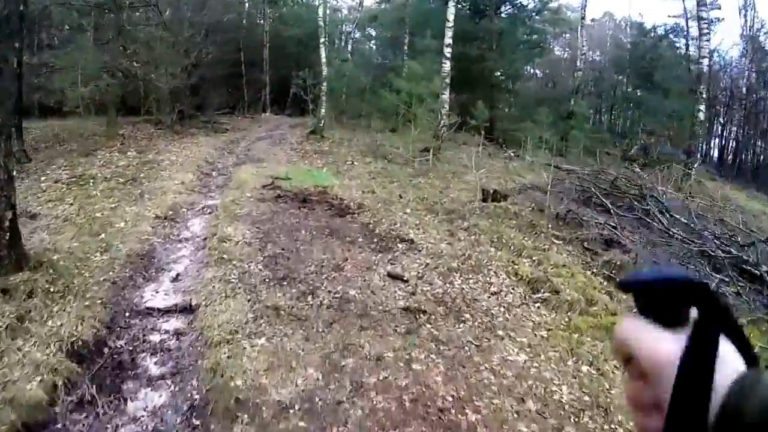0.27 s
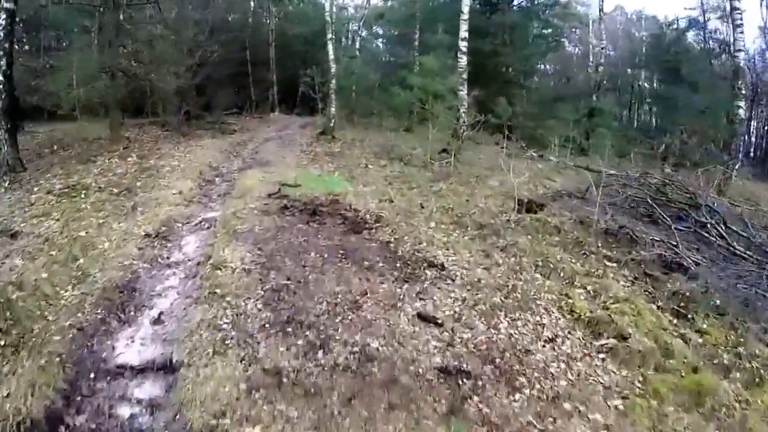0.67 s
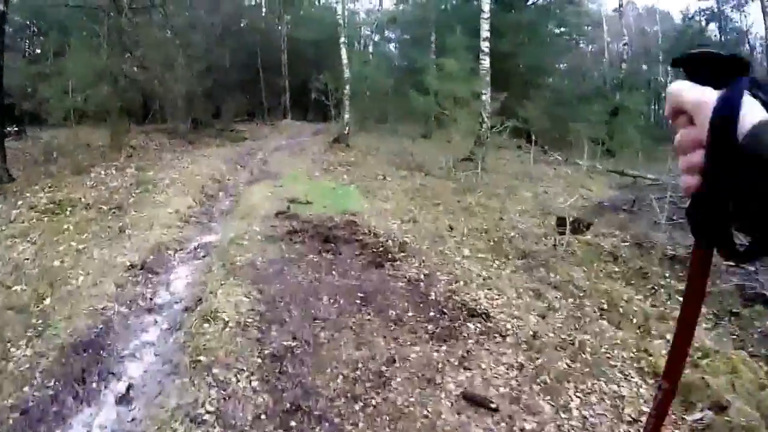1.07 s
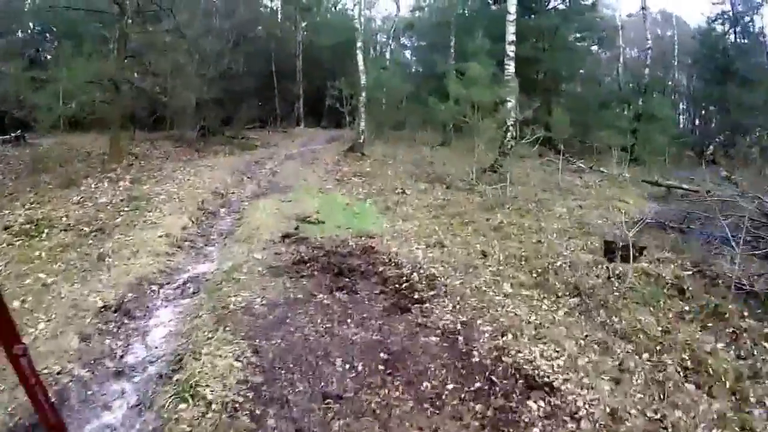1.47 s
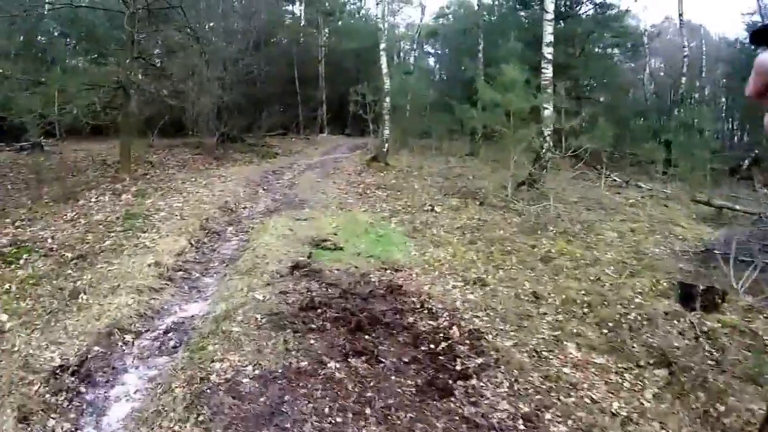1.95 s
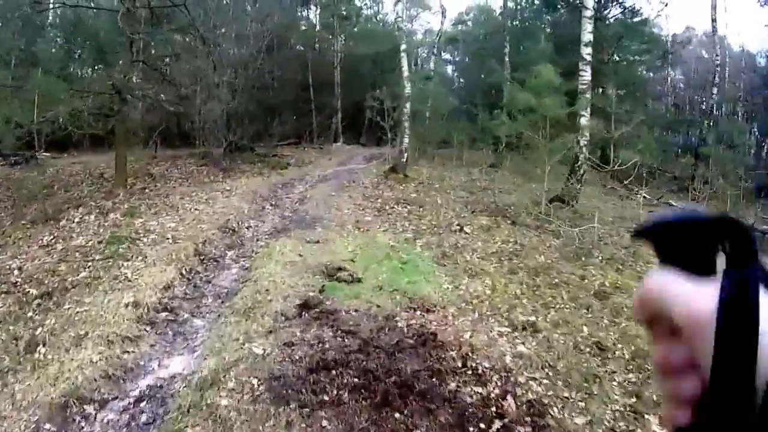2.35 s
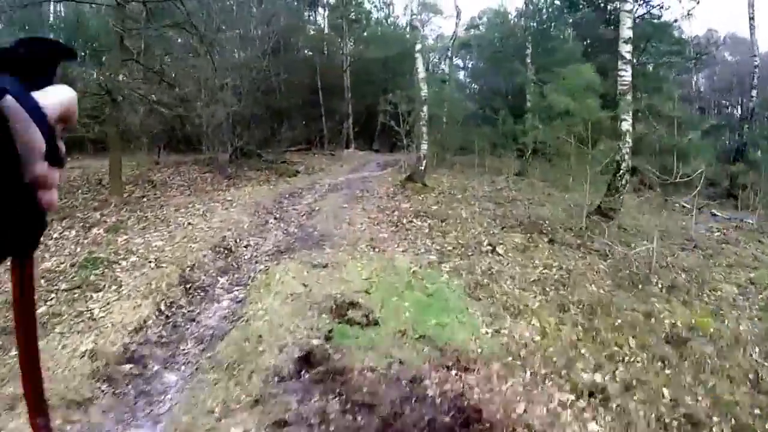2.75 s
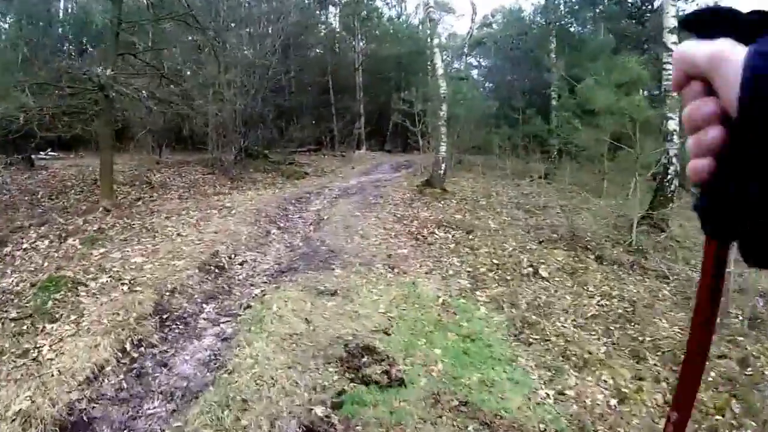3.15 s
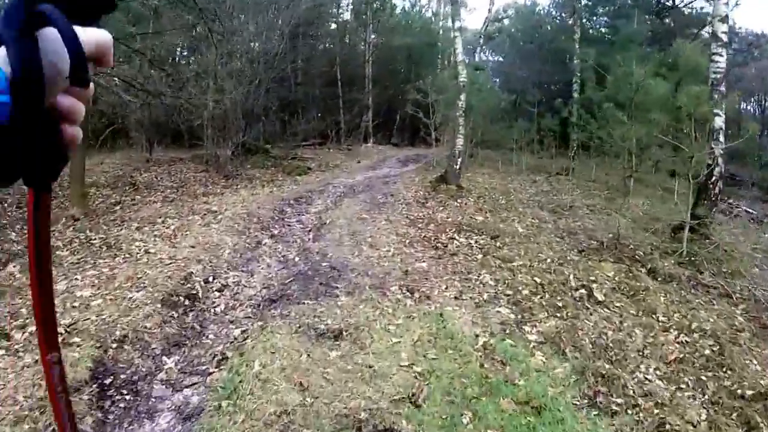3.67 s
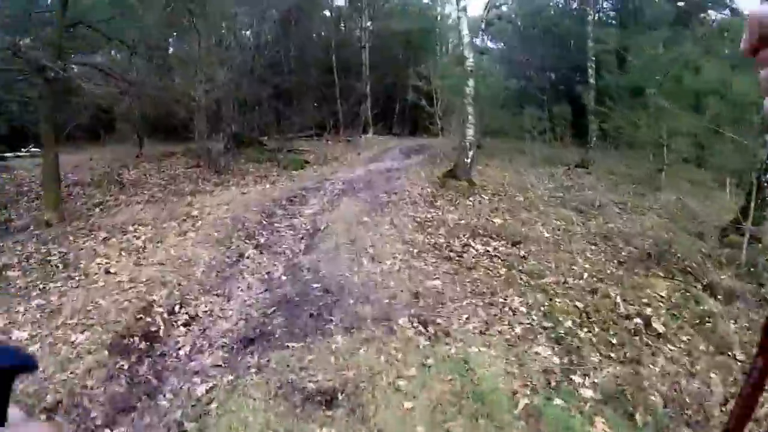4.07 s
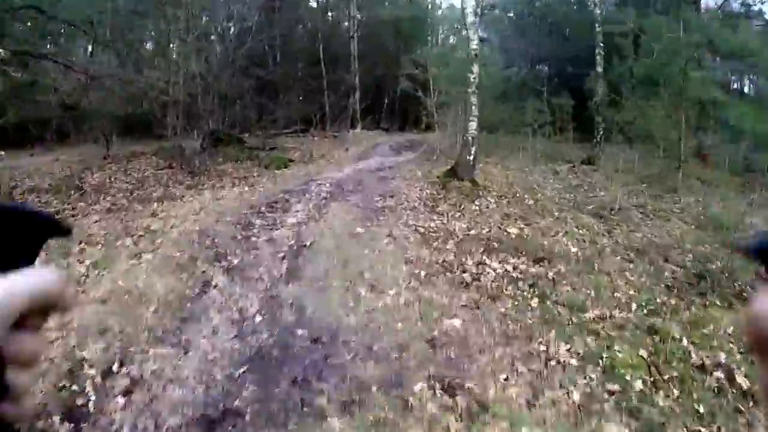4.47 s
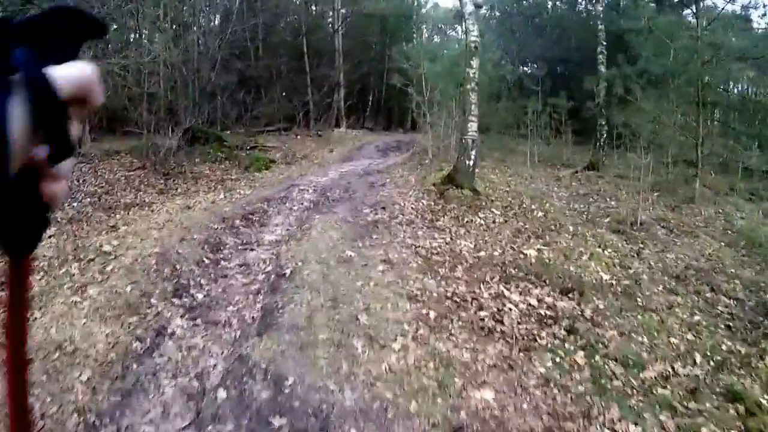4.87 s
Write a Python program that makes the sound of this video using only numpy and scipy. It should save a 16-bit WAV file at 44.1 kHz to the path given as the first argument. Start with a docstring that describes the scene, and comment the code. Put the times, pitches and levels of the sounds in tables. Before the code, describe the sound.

A hiker with poles walks steadily through woodland for about five seconds, heard by a body-worn microphone sealed in a plastic case. Ten steps fall roughly every half second, near 0.3, 0.9, 1.4, 1.9, 2.4, 3.0, 3.5, 4.0, 4.6 and 5.1. Each is a deep sway and shudder with soft, cushioned thumps that briefly ring the mount, and a short dull pat of damp soil. Leaves rustle and crunch in granular clumps, quieter in the first step, fuller from 1.3 onward. Twigs crack in dry, boxy little snaps at 0.8 and 1.3, in a dense cluster from 1.8 to 2.1, then at 2.3, 2.8 to 3.0, 3.5, 4.0, 4.5 to 4.7 and 4.9. One pole tip clicks sharply on stone at 3.15. The case colours the crackle with narrow mid-high resonances and dulls the treble. Constant soft hiss and faint air lie underneath.

```python
"""Forest walk with trekking poles

A hiker walks on soft, leafy ground, heard by a body-worn camera in a closed plastic case.
Each step is swaying and shuddering noise with shaped jolts; landings are soft pushes that ring the mount.
Leaves crunch as clumps of tiny snaps, twigs crack as pitched noise bursts, and a pole tip clicks on stone.
The case muffles leaves, twigs and tip and rings at a few resonances, over a steady hiss and faint air."""
import sys
import numpy as np
from scipy import signal
from scipy.fft import rfft, irfft
from scipy.io import wavfile
from scipy.ndimage import uniform_filter1d, map_coordinates

SR = 44100
rng = np.random.default_rng(int(sys.argv[2]) if len(sys.argv) > 2 else 0)


def wav_out(sig):
    """Save sig, one row per channel (or a flat mono array), as 16-bit PCM at SR to the path in sys.argv[1]."""
    wavfile.write(sys.argv[1], SR, np.round(np.clip(np.atleast_2d(sig).T, -1, 1) * 32767).astype(np.int16))


N = 225615
HZ = np.fft.rfftfreq(2 ** 18, 1 / SR)  # frequency grid of every filter


def amp(db):
    """Decibels to gain."""
    return 10 ** (np.asarray(db) / 20)


def unit(x):
    """Scale x to rms 1."""
    return x / np.sqrt(np.mean(x ** 2) + 1e-20)


def colour(points):
    """Gain of a (frequency [Hz], level [dB]) spectrum, read on a log frequency axis."""
    hz, db = np.transpose(points)
    return amp(np.interp(np.log(HZ + 1), np.log(hz + 1), db))


def resonances(modes):
    """Causal response of damped modes side by side, each (frequency [Hz], width [Hz], gain [dB])."""
    return sum(amp(db) * 1j * HZ * width / (hz * hz - HZ ** 2 + 1j * HZ * width)
               for hz, width, db in modes)


def filtered(x, response):
    """Pass x through a frequency response."""
    padded_size = 2 * (len(HZ) - 1)
    return irfft(rfft(x, padded_size) * response)[:N]


def noise(response):
    """Coloured noise at rms 1."""
    return unit(filtered(rng.standard_normal(N), response))


def even(x, size=3000):
    """Noise held near rms 1, so that it neither fades out nor surges."""
    smoothed = uniform_filter1d(uniform_filter1d(x ** 2, size), size)
    power = np.abs(smoothed)
    return unit(x / np.sqrt(power + power.mean() / 10))


def wobble(rate):
    """A smooth random curve with rate knots a second."""
    knots = rng.standard_normal(int(N * rate / SR) + 4)
    return map_coordinates(knots, [np.arange(N) * rate / SR])


def causal(gain, size=4096):
    """The most prompt (minimum-phase) impulse response with this gain, found by folding its cepstrum."""
    coarse = gain[::2 * (len(HZ) - 1) // size]
    cepstrum = irfft(np.log(np.maximum(coarse, 1e-6)))
    cepstrum[1:size // 2] *= 2
    cepstrum[size // 2 + 1:] = 0
    return irfft(np.exp(rfft(cepstrum)))


def add(track, s, sound):
    """Mix a sound into the track at time s."""
    part = track[max(0, round(s * SR)):][:len(sound)]
    part += sound[:len(part)]


def swell(s, hold_s, rise_db_per_s, fall_db_per_s):
    """A gain that rises, holds around time s and falls, straight in decibels."""
    t = np.arange(N) / SR
    start, end = s - hold_s / 2, s + hold_s / 2
    below_db = np.maximum(rise_db_per_s * (start - t), fall_db_per_s * (t - end))
    return amp(-np.clip(below_db, 0, 120))


def stride(times, levels_db, shape, rest_db):
    """Every step swells in the same shape, at its own level, over a resting level; powers add."""
    delay, *form = shape
    power = amp(rest_db) ** 2
    for s, db in zip(times, levels_db):
        power = power + (amp(db) * swell(s + delay, *form)) ** 2
    return np.sqrt(power)


# footsteps: (time of mid-stance [s], sway level [dB], shudder level [dB], rustle level [dB])
FOOTSTEPS = [(0.282, -42.5, -58.5, -64.5), (0.861, -42.5, -58.5, -64.5), (1.403, -39.5, -55, -62.5),
             (1.946, -38.5, -56.5, -61), (2.427, -39.5, -53.5, -62), (3.02, -41.5, -54.5, -62),
             (3.484, -37.5, -54.5, -61), (4.036, -39.5, -53, -64.5), (4.556, -39, -56, -61),
             (5.061, -40.5, -51.5, -62)]
# body jolts as a foot takes the weight and pushes off: (time [s], peak level [dB], half length [s])
BODY_JOLTS = [(0.268, -32, .012), (0.42, -39, .016), (0.847, -25.5, .013), (0.945, -36, .022),
              (1.37, -30, .018), (1.488, -31, .018), (1.929, -29.5, .017), (2.003, -28, .015),
              (2.36, -39, .012), (2.419, -28.5, .013), (2.505, -38, .014), (3.002, -28.5, .015),
              (3.072, -36, .014), (3.418, -37.5, .016), (3.551, -27.5, .014), (4.012, -26.5, .016),
              (4.1, -36, .02), (4.39, -41, .012), (4.54, -28.5, .014), (4.65, -35, .018),
              (5.015, -32, .014)]
# relative noise spectra of the rocking camera and its shaking mount: (frequency [Hz], level [dB])
SWAY_SPECTRUM = [(2, -31), (6, 0.5), (10, 2), (16, -4), (24, -22), (33, -16), (48, -24), (70, -27.5),
                 (130, -42), (400, -120)]
SHUDDER_SPECTRUM = [(30, -3), (55, 3.5), (85, 1), (110, 4), (145, -6), (220, -10.5), (350, -9.5),
                    (600, -24), (1500, -22), (4000, -100)]
# swell within a step: (middle after mid-stance [s], hold [s], rise [dB/s], fall [dB/s])
SWAY_SWELL = (0.0094, 0.16, 217, 130)
SHUDDER_SWELL = (0.056, 0.013, 33, 97)


def body(shudder_db=-3, rest_sway_db=-57.5, rest_shudder_db=-67.5):
    """The stride rocks the camera, jolts it on landing and push-off and makes the mount shudder."""
    times, sways, shudders, _ = np.transpose(FOOTSTEPS)
    out = stride(times, sways, SWAY_SWELL, rest_sway_db) * even(noise(colour(SWAY_SPECTRUM)))
    shudder = stride(times, shudders, SHUDDER_SWELL, rest_shudder_db) * even(noise(colour(SHUDDER_SPECTRUM)))
    out += amp(shudder_db) * shudder
    for s, db, half in BODY_JOLTS:
        u = (np.arange(N) / SR - s) / half
        push = (1 - u ** 2) / (1 + u ** 2 / 3) ** 3  # one push between two rebounds
        out += amp(db) * push
    return out


# heels and soles knocking on the ground, with a higher cut-off on firm ground:
# (time [s], relative push level [dB], push cut-off [Hz], soil pat level [dB])
GROUND_THUDS = [(0.152, -47, 397, -55), (0.211, -48, 496, -55), (0.452, -43.5, 240, -63),
                (0.764, -50, 150, -58), (0.799, -57, 600, -48.5), (0.819, -47, 400, -51.5),
                (0.831, -39.5, 450, -54), (0.882, -43, 250, -67), (0.967, -44.5, 303, -60),
                (1.323, -38, 250, -53.5), (1.413, -40, 200, -69), (1.4238, -48, 350, -70),
                (1.475, -45.5, 300, -55), (1.839, -45, 400, -54), (1.916, -43, 500, -50),
                (1.934, -37.5, 400, -49.5), (1.993, -43.5, 300, -70), (2.08, -48.5, 400, -55),
                (2.362, -47, 121, -58), (2.453, -51, 240, -66), (2.947, -49, 300, -52),
                (2.996, -44, 300, -53), (3.168, -40.5, 300, -51), (3.477, -39, 151, -64),
                (3.535, -41, 500, -49.5), (3.543, -34, 180, -60), (3.963, -61, 354, -45),
                (3.995, -43, 500, -68), (4.48, -57, 300, -48), (4.652, -43, 201, -64),
                (4.955, -42, 403, -54), (5.037, -52, 400, -46)]
# resonances of the camera mount: (frequency [Hz], width [Hz], gain [dB])
MOUNT_MODES = [(50, 13, 0.5), (104.6, 22, 5), (182, 91, -37.5)]


def thuds(level_db=-2, pat_hz=175, pat_width_hz=160, pat_t60_s=0.069, pat_attack_s=0.0021):
    """The ground cushions each landing into a push that rings the mount; the damp soil gives a short pat."""
    out, t = np.zeros(N), np.arange(SR // 4) / SR
    mount = resonances(MOUNT_MODES)
    soil = noise(resonances([(pat_hz, pat_width_hz, 0)]) ** 2)
    fade = amp(-60 * t / pat_t60_s) * (1 - np.exp(-t / pat_attack_s))
    fade_rms = np.sqrt(np.mean(fade ** 2))
    for s, db, soft_hz, pat_db in GROUND_THUDS:
        cushion = (1 + 1j * HZ[::8] / soft_hz) ** 2  # two gentle low-passes
        push = irfft(mount[::8] / cushion)[:len(t)]
        push = push / np.abs(push).max()
        soil_here = np.roll(soil, -round(s * SR))[:len(t)]
        pat = unit(soil_here * fade) * fade_rms
        add(out, s, amp(pat_db) * pat - amp(db + level_db) * push)
    return out


# boots and pole tips pressing into leaves; brightness is positive on dry leaves, negative on damp soil:
# (time of the middle [s], relative level [dB], hold [s], brightness [dB])
LEAF_CRUNCHES = [(0.217, -60, 0.017, -8), (0.278, -60.5, 0.027, 2.5), (0.412, -66.5, .006, -4.5),
                 (0.452, -67, 0.019, 9), (0.765, -60, 0.021, -7), (0.8, -60.5, 0.033, 1),
                 (0.982, -68, .006, 3), (1.342, -56, 0.038, 1), (1.43, -55, 0.013, -2),
                 (1.478, -55, 0.016, -3), (1.745, -63.5, 0.06, 0), (1.923, -51, 0.014, -4),
                 (1.958, -54, 0.03, -4), (2.078, -59, 0.021, -5), (2.28, -61, 0.087, -7),
                 (2.775, -65, 0.048, 7.5), (2.94, -53, 0.0063, -8), (3.023, -54.5, 0.054, 2.5),
                 (3.09, -57, 0.011, -11.5), (3.441, -56.5, 0.01, 1), (3.501, -60.5, 0.018, 5),
                 (3.541, -61.5, 0.0083, -5), (3.81, -58, 0.023, -7), (4.003, -57, 0.053, 0.5),
                 (4.455, -54, 0.023, -5), (4.493, -58.5, 0.026, -7), (4.647, -68, 0.0055, -4),
                 (4.669, -61.5, 0.0099, 2.5), (4.934, -60.5, .006, 2), (4.971, -55, 0.011, -2.5),
                 (5.046, -52, 0.017, -4.5)]
# edges of a crunch: (rise [dB/s], fall [dB/s])
CRUNCH_EDGES = (500, 630)
# rustle swell within a step: (middle after mid-stance [s], hold [s], rise [dB/s], fall [dB/s])
RUSTLE_SWELL = (.01, .18, 40, 45)


def tread(rest_rustle_db=-75.5):
    """Dull and bright leaf levels: a long rustle as each foot rolls, crunches where a sole or tip sinks in."""
    times, _, _, rustles = np.transpose(FOOTSTEPS)
    dull = bright = stride(times, rustles, RUSTLE_SWELL, rest_rustle_db) ** 2
    for s, db, hold, bright_db in LEAF_CRUNCHES:
        power = (amp(db) * swell(s, hold, *CRUNCH_EDGES)) ** 2
        dull = dull + power
        bright = bright + power * amp(bright_db) ** 2
    return np.sqrt(dull), np.sqrt(bright)


def litter(level_db=-1, snaps_per_s=1100, snap_spread_db=2.8, clump_db=2.3, split_hz=1900, order=12):
    """Leaves break in tiny snaps, in clumps, denser as the weight comes on them."""
    dull, bright = tread()
    density = snaps_per_s * np.sqrt(dull / dull.max())  # full rate at the heaviest moment
    snaps = rng.random(N) < density / SR
    sizes = amp(snap_spread_db * np.minimum(rng.exponential(size=N), 3))
    signs = rng.choice([-1, 1], N)
    # dividing by the root of the density leaves the loudness to the tread levels
    clumped = snaps * signs * sizes / np.sqrt(density) * amp(clump_db * wobble(60))
    crackle = through_case(clumped)
    lower = filtered(crackle, 1 / (1 + (HZ / split_hz) ** order))
    upper = crackle - lower
    return amp(level_db) * (dull * lower + bright * upper)


# twigs cracking under boots and poles:
# (time [s], relative level [dB], twig pitch [Hz], pitch spread [octaves], crumble time to -60 dB [s])
TWIG_CRACKS = [(0.7985, -47, 1900, .4, .014), (0.8122, -40, 2320, .14, .018), (0.8155, -40, 1560, .12, .02),
               (1.3235, -42.5, 2400, .8, .008), (1.3248, -39.5, 2080, .14, .012),
               (1.356, -42, 1600, .25, .028), (1.467, -49, 1580, .2, .016), (1.483, -44.5, 1600, .3, .02),
               (1.8055, -38.5, 1550, .36, .013), (1.8355, -40.5, 2300, .3, .018),
               (1.8372, -36.5, 1580, .3, .024), (1.877, -36.5, 1580, .4, .013),
               (1.9165, -43.5, 1750, .6, .014), (1.925, -44.5, 2650, .3, .012),
               (1.9725, -45, 2650, .3, .008), (1.9915, -42, 2200, .7, .016), (2.091, -48, 1600, .25, .016),
               (2.2715, -43.5, 1650, .7, .012), (2.78, -44.5, 2000, .8, .016),
               (2.937, -38, 1600, .17, .025), (3.0115, -47, 2250, .25, .014),
               (3.0245, -43, 2500, .35, .018), (3.539, -46.5, 2250, .5, .022),
               (3.9765, -40.5, 1750, .55, .018), (3.984, -46, 2800, .4, .022),
               (3.995, -45, 2600, .45, .018), (4.4545, -44, 2350, .3, .024), (4.466, -48, 2700, .3, .016),
               (4.493, -45, 1560, .2, .016), (4.587, -48.5, 1600, .3, .018),
               (4.6637, -44.5, 1600, .5, .018), (4.9025, -45, 2300, .6, .012),
               (4.9555, -39.5, 1650, .45, .016), (4.969, -44, 1560, .2, .02)]


def cracks(level_db=-1.5, broadband_db=-14, crumble=.13):
    """Each twig breaks around its own pitch and crumbles briefly; both ring the case."""
    out, t = np.zeros(N), np.arange(SR // 16) / SR
    shell = np.abs(case() + leak())
    for s, db, hz, spread, life in TWIG_CRACKS:
        force = crumble * rng.standard_normal(len(t)) * amp(-60 * t / life)  # splinters
        force[0] += 1  # the first snap
        octaves_off = np.log2((HZ + 1) / hz)
        twig = np.exp(-(octaves_off / spread) ** 2 / 2) + amp(broadband_db)
        ring = signal.fftconvolve(force, causal(shell * twig))
        strength = np.sqrt(np.sum(ring ** 2) / (SR / 1000))  # its energy, packed into a millisecond
        add(out, s, amp(db + level_db) * ring / strength)
    return out


# a pole tip clicking on a stone: (time [s], relative level [dB])
TIP_CLICKS = [(3.1464, -35)]
# ringing modes of the tip: (frequency [Hz], relative level [dB], decay to -60 dB [s])
TIP_RINGS = [(2410, -3.5, 0.021), (2850, -1, 0.022), (3100, 15, 0.0032), (3560, -5, 0.0027)]


def pole_tip(level_db=2, bounce_s=0.00195, bounce_db=-10, contact_s=0.00064, case_db=-9):
    """The hard tip gives a bright click of decaying modes, skips once and faintly rings the case."""
    out, t = np.zeros(N), np.arange(SR // 20) / SR
    click = sum(amp(db - 60 * t / t60) * np.cos(2 * np.pi * hz * t) for hz, db, t60 in TIP_RINGS)
    click = click * (1 - np.exp(-t / contact_s))  # the contact softens the onset
    click = click / np.abs(click).max()
    for s, db in TIP_CLICKS:
        add(out, s, amp(db + level_db) * click)
        add(out, s + bounce_s, amp(db + level_db + bounce_db) * click)
    return filtered(out, muffled() + amp(case_db) * case())


# relative spectrum of the microphone hiss: (frequency [Hz], level [dB])
HISS_SPECTRUM = [(15, -22.5), (40, -8.5), (70, -7), (150, -7.5), (400, -15.5), (700, -17), (1200, -21.5),
                 (2000, -21.5), (3200, -24.5), (4500, -29), (7000, -33), (10000, -39), (13000, -43.5),
                 (15000, -49)]


def background(hiss_db=-60, air_db=-76):
    """Microphone hiss as coloured noise, and forest air as white noise heard through the case."""
    hiss = amp(hiss_db) * noise(colour(HISS_SPECTRUM))
    air = amp(air_db) * through_case(rng.standard_normal(N))
    return hiss + air


def muffled(wall_hz=4000, order=7):
    """The case wall shuts out the treble steeply."""
    return signal.freqs(*signal.butter(order, 1, analog=True), HZ / wall_hz)[1]


# resonances of the plastic case, before its stiffness and wall: (frequency [Hz], width [Hz], gain [dB])
CASE_MODES = [(1465, 75, -11.5), (1560, 78, 4), (1606, 49, -6.5), (2092, 115, -5.5), (2416, 186, -4),
              (2746, 75, -3), (2842, 55, -9), (3420, 174, -13), (4000, 410, -18.5)]


def case(stiff_hz=1050, modes=CASE_MODES):
    """The case passes sound at its resonances; the wall barely moves below the first one."""
    stiff = signal.freqs(*signal.butter(2, 1, "high", analog=True), HZ / stiff_hz)[1]
    return resonances(modes) * stiff * muffled()


# leakage between the case resonances, before the wall muffles it: (frequency [Hz], gain [dB])
LEAK_SPECTRUM = [(100, -37), (400, -27), (1100, -36.5), (2000, -56), (4500, -63), (15000, -60)]


def leak():
    """The little that the case lets through between its resonances."""
    return colour(LEAK_SPECTRUM) * muffled()


def through_case(x, tint_db=6, flicker_db=1.4, flicker_per_s=40):
    """Every snap comes from a new spot, driving each resonance more or less; each resonance flickers."""
    out = filtered(x, leak())
    for mode in CASE_MODES:
        tinted = x * amp(tint_db * rng.uniform(-1, 1, N))
        ring = filtered(tinted, case(modes=[mode]))
        out += ring * amp(flicker_db * wobble(flicker_per_s))
    return unit(out)


def scene():
    """The walk, at one microphone."""
    return (body() + thuds() + litter() + cracks() + pole_tip() + background())[None]


def record(dry, top_hz=15100):
    """The camera keeps nothing above its band limit."""
    return np.array([filtered(x, HZ < top_hz) for x in dry])


dry = scene()
out = record(dry)
wav_out(out)
```